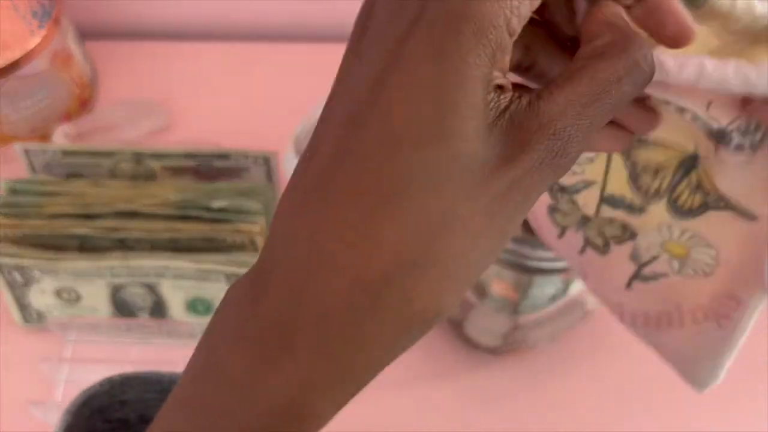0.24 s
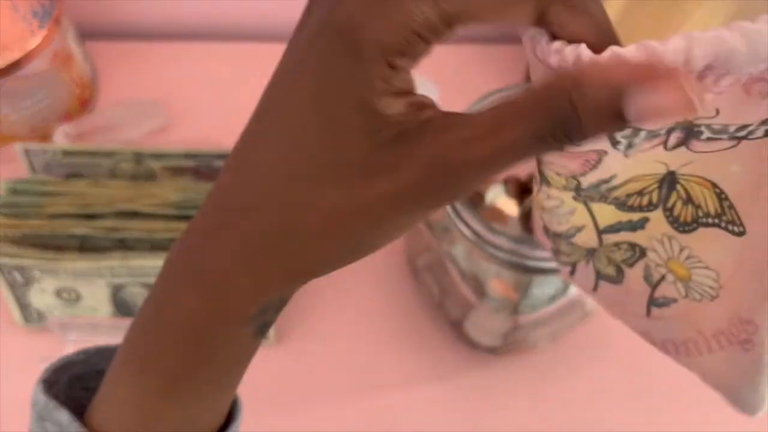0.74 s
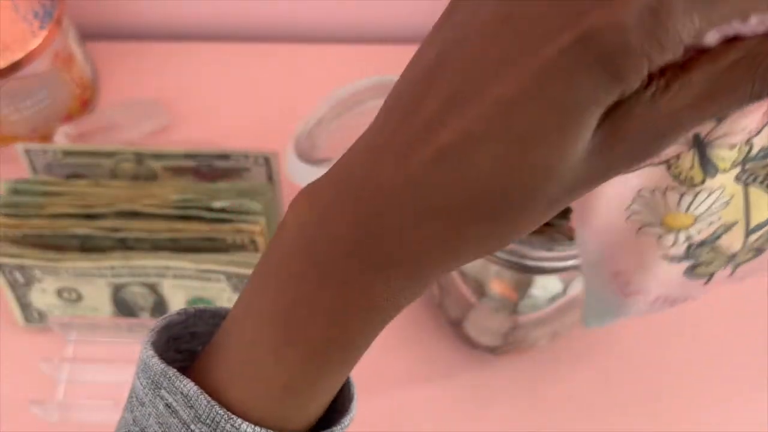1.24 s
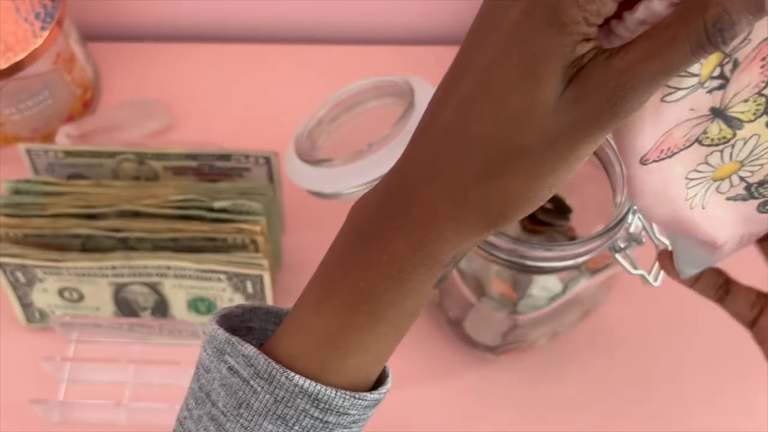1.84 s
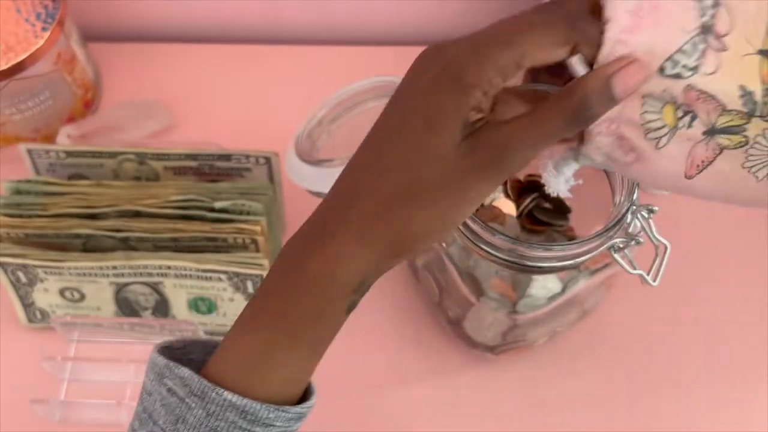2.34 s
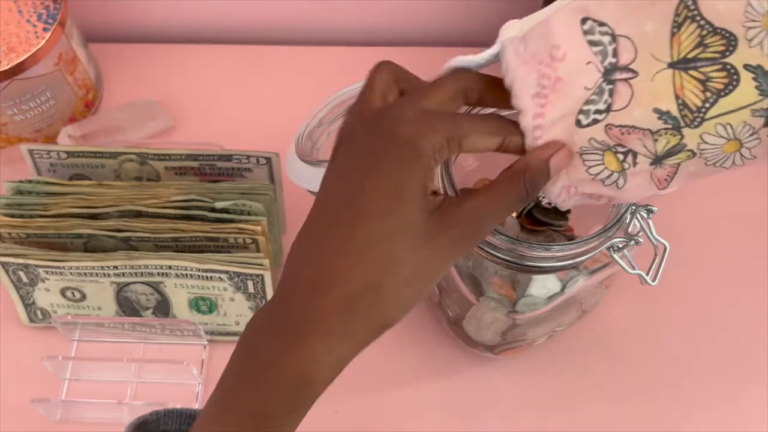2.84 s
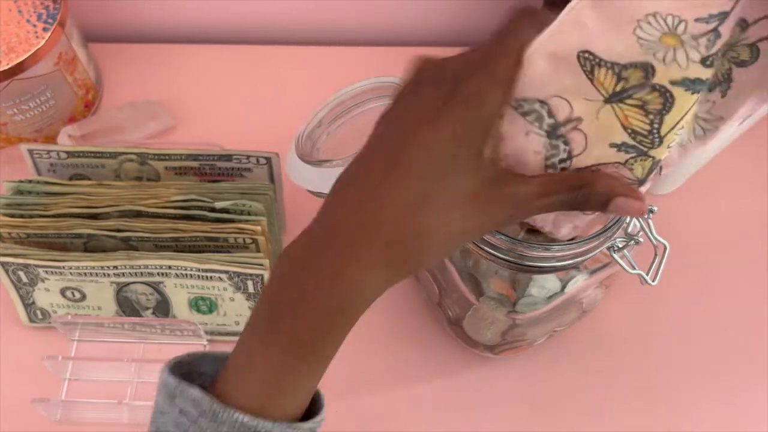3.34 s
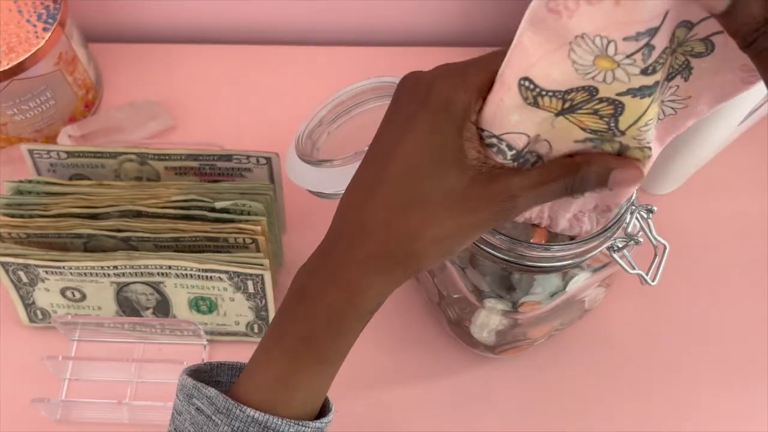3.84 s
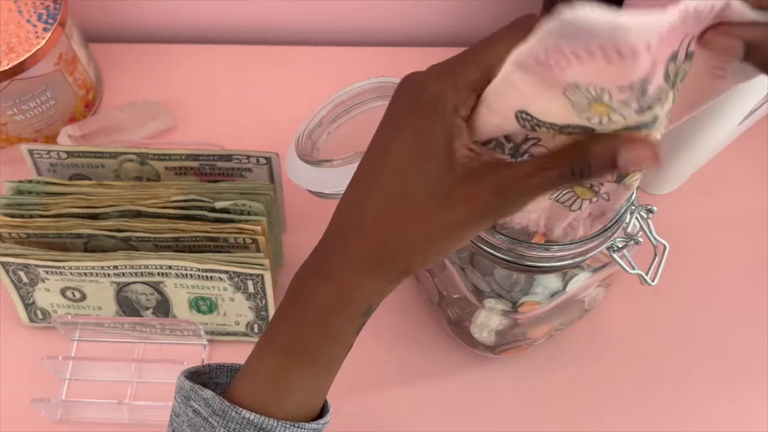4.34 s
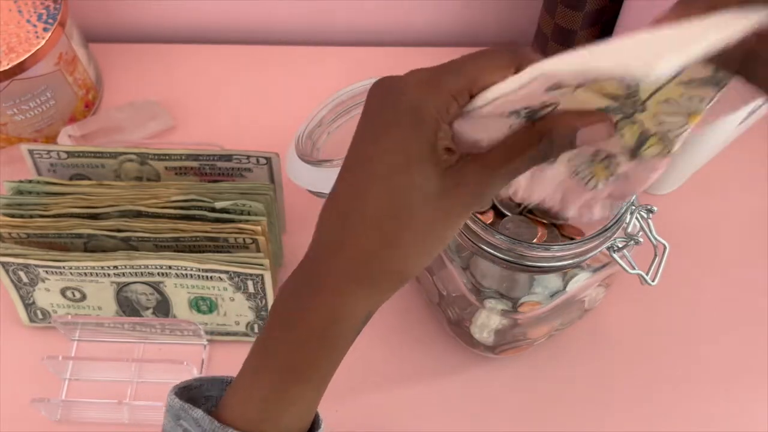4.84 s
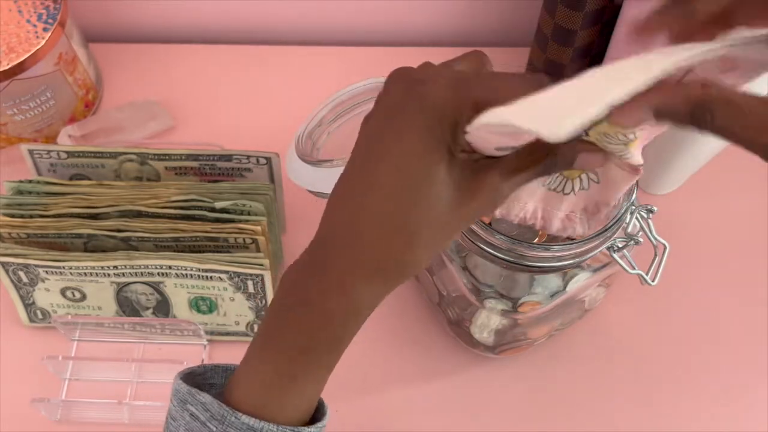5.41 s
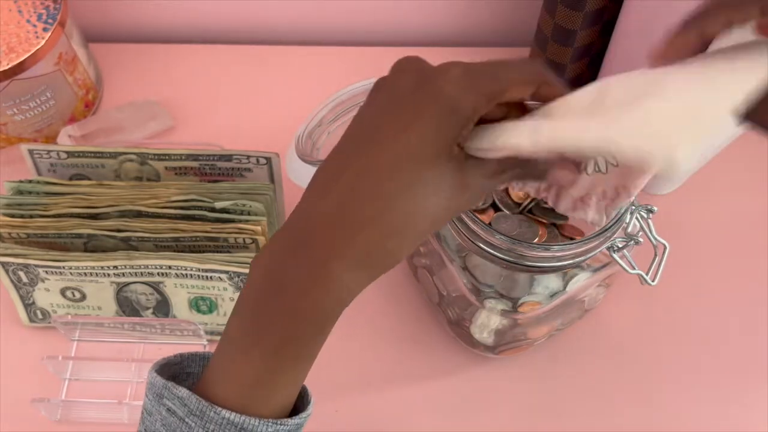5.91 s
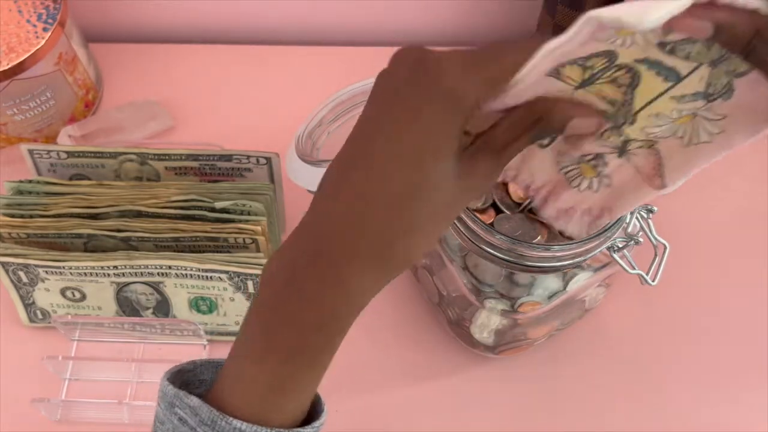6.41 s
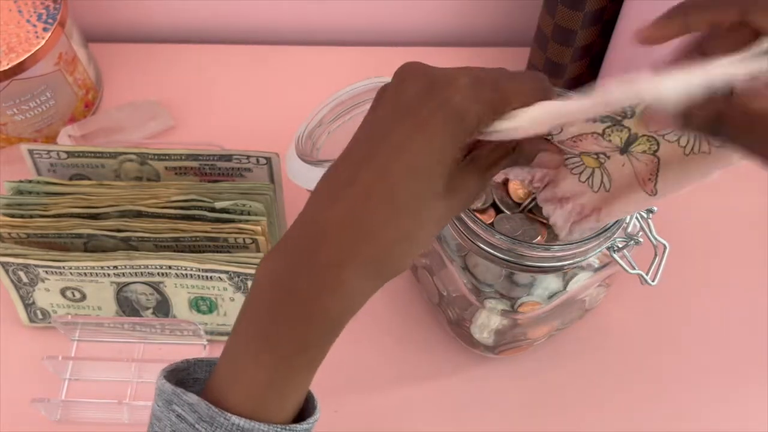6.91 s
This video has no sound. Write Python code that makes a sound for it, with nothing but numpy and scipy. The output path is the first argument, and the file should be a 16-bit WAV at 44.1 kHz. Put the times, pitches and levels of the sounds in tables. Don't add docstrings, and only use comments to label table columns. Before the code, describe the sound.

Faint pouch jingles build to a loud, bright crash of coins landing in a glass jar, then sparse clinks and soft knocks in a quiet room.

```python
import sys
import numpy as np
from scipy import signal
from scipy.fft import rfft, irfft
from scipy.io import wavfile
from scipy.ndimage import uniform_filter1d, minimum_filter1d, map_coordinates

SR = 44100
rng = np.random.default_rng(int(sys.argv[2]) if len(sys.argv) > 2 else 0)


def master(y):
    cut = np.clip(np.atleast_2d(y).T, -1, 1)
    pcm = np.round(cut * 32767)
    wavfile.write(sys.argv[1], SR, pcm.astype(np.int16))


def attenuation_scalar(level_db):
    decades = np.asarray(level_db, float) / 20
    return 10 ** decades


N = 316197


def rms_one(x):
    return x / np.sqrt(np.mean(x ** 2) + 1e-20)


def add(out, s, sound):
    first = round(s * SR)
    out[first:first + len(sound)] += sound


def in_time(rows):
    s, value = np.transpose(rows)
    return np.interp(np.arange(N) / SR, s, value)


def at_hz(points, hz):
    point_hz, value = np.transpose(points)
    return np.interp(np.log(hz), np.log(point_hz), value)


def colour(x, spectrum):
    hz = np.maximum(np.fft.rfftfreq(N, 1 / SR), 1)
    return rms_one(irfft(rfft(x) * attenuation_scalar(at_hz(spectrum, hz)), N))


def drift(rate):
    knots = rng.standard_normal(400)
    return map_coordinates(knots, [np.arange(N) / SR * rate * 2], order=3)


def tone(hz, level_db):
    return np.sqrt(2) * attenuation_scalar(level_db) * np.sin(2 * np.pi * np.cumsum(hz) / SR)


def ring(clicks, hz, t60):
    radius = attenuation_scalar(-60 / (max(t60, .004) * SR))
    w = 2 * np.pi * hz / SR
    return signal.lfilter([0, np.sin(w)], [1, -2 * radius * np.cos(w), radius ** 2], clicks + 1e-18)


def strike(times, level_db, modes, spread_db, detune):
    out, t = np.zeros(N + SR), np.arange(SR // 3)[:, None] / SR
    hz, mode_db, t60 = np.transpose(modes)
    for s, db, luck in zip(times, level_db, rng.standard_normal((len(times), 3, len(modes)))):
        height = attenuation_scalar(db + mode_db + spread_db * luck[0]) * np.sign(luck[1])
        blow_hz = hz * (1 + detune * luck[2])
        waves = np.sin(2 * np.pi * blow_hz * t) * np.exp(-np.log(1000) * t / t60)
        add(out, s, waves @ height)
    return out[:N]


def grains(per_s, size_db, clump_db):
    sizes = attenuation_scalar(size_db * np.minimum(rng.exponential(1, N), 4)) * rng.choice([-1, 1], N)
    chance = per_s * attenuation_scalar(clump_db * drift(14)) / SR
    return sizes * (rng.random(N) < chance)


def rattle(clicks, modes):
    dealt = rng.integers(0, len(modes), N)
    total = 0
    for k, (hz, db, t60) in enumerate(modes):
        total = total + attenuation_scalar(db) * ring(clicks * (dealt == k), hz, t60)
    return rms_one(total)


# time_s, level_db
MOTOR_LEVEL = [(0, -45), (.4, -40.5), (.86, -39.5), (1.36, -41), (1.84, -39), (2.46, -43.5), (3.0, -42.5),
               (3.4, -45), (3.8, -45), (4.2, -41), (4.9, -40.5), (5.65, -40.5), (6.25, -43.5),
               (7.17, -42.5)]


def motor():
    hum = tone(59 + 0.2 * drift(2.7), in_time(MOTOR_LEVEL))
    whine = tone(239.7 + 1.5 * drift(8.7), -67.5 + 2.7 * drift(4.4))
    return hum + whine


# time_s, level_db
SWAY_LEVEL = [(0.0, -37.5), (0.12, -53.5), (0.8, -21), (1.05, -20.5), (1.2, -28.5), (1.33, -17.5),
              (1.48, -24), (1.74, -47), (1.82, -48), (4.93, -47.5), (5.15, -40.5), (7.17, -54)]
# time_s, swings_hz
SWAY_PACE = [(0.4, 4.2), (1.1, 4.0), (1.25, 6.16), (1.4, 4.16)]


def pressure_sway():
    swings = np.cumsum(in_time(SWAY_PACE)) / SR
    crest = swings[round(.92 * SR)]
    return np.sqrt(2) * attenuation_scalar(in_time(SWAY_LEVEL)) * np.cos(2 * np.pi * (swings - crest))


# freq_hz, density_db_per_hz
AIR = [(100, -40.5), (175, -15), (239, -11.5), (300, -11.5), (600, -14.5), (1240, -27.5), (6600, -31),
       (15800, -63)]
# freq_hz, density_db_per_hz
RUMBLE = [(8, -1), (30, 3.5), (42, -15), (84, -12), (100, -15.5), (132, -12.5), (165, -27), (220, -52)]


def room_tone():
    air = attenuation_scalar(-70.5 + 0.4 * drift(6.3)) * colour(rng.standard_normal(N), AIR)
    rumble = attenuation_scalar(-52) * colour(rng.standard_normal(N), RUMBLE)
    return air + rumble


# freq_hz, t60_s
ROOM_T60 = [(120, .42), (400, .42), (1500, .36), (4000, .38), (7000, .33), (13000, .28)]


def room(x):
    t, echo = np.arange(SR // 2) / SR, 0
    edges = 70 * 2. ** np.arange(9)
    for low, high in zip(edges, edges[1:]):
        octave = signal.butter(2, [low, min(high, .45 * SR)], "band", fs=SR, output="sos")
        t60 = at_hz(ROOM_T60, low * 1.4)
        echo = echo + signal.sosfilt(octave, rng.standard_normal(len(t))) * attenuation_scalar(-60 * t / t60)
    echo = echo * np.clip((t - .002) / 0.0042, 0, 1)
    return signal.fftconvolve(x, echo / np.sqrt(np.sum(echo ** 2)))[:N]


# start_s, level_db, pitch_hz, length_s
CREAKS = [
    (0.056, -57.5, 780, 0.039),
    (2.632, -50.5, 430, 0.079),
    (5.923, -63, 497, 0.064),
    (6.784, -70, 1040, 0.097),
]


def creaks():
    out, t = np.zeros(N), np.arange(N) / SR
    cycles = np.cumsum(1 + 0.052 * drift(12)) / SR
    slips = rms_one(signal.lfilter([1], [1, -1.98, .9801], rng.standard_normal(N)))
    flutter = attenuation_scalar(1.9 * drift(22)) * (1 + 1.2 * slips)
    for s, db, hz, length in CREAKS:
        shape = np.sin(np.pi * np.clip((t - s) / length, 0, 1)) ** 2
        out += attenuation_scalar(db) * shape * flutter * np.sin(2 * np.pi * hz * cycles)
    return out


def gestures(rows, resting_db):
    start, length, *columns = np.transpose(rows)[:, :, None]
    t = np.arange(0, N + 64, 64) / SR
    rise_db_per_s, fall_db_per_s = 300, 209
    off_db = rise_db_per_s * np.maximum(start - t, 0) + fall_db_per_s * np.maximum(t - start - length, 0)
    levels = []
    for column in columns:
        power = np.sum(attenuation_scalar(column - off_db) ** 2, axis=0) + attenuation_scalar(resting_db) ** 2
        levels.append(np.interp(np.arange(N) / SR, t, 10 * np.log10(power)))
    return levels


# start_s, length_s, level_db
RUSTLES = [(.08, 0.074, -62.5), (.15, 0.44, -70), (.46, 0.026, -67), (.72, 0.09, -68.5), (1.0, 0.16, -68),
           (2.4, 0.33, -58.5), (2.88, 0.12, -72), (3.13, 0.38, -60), (3.5, 0.22, -40), (3.75, 0.12, -50),
           (4.04, 0.042, -63.5), (4.28, 0.13, -62), (4.5, 0.044, -48.5), (4.73, 0.25, -62),
           (5.3, 0.056, -63), (5.58, .12, -68.5), (5.94, 0.028, -70), (6.3, 0.21, -65), (6.7, 0.14, -70),
           (7.0, 0.076, -68)]
# freq_hz, density_db_per_hz
CLOTH = [(120, -54), (200, -19), (240, -11), (428, -5), (1240, -21), (2500, -30), (3250, -36), (5500, -120)]


def rustling_cloth():
    cloth_db, = gestures(RUSTLES, resting_db=-81.5)
    return attenuation_scalar(cloth_db - 1.5) * colour(grains(900, 3.0, 2.3), CLOTH)


# start_s, length_s, slide_db, tumble_db
STIRS = [(.08, 0.42, -70.5, -66.5), (.29, .03, -66, -85), (.46, .04, -61, -74), (.6, 0.23, -78, -74),
         (.94, 0.17, -86, -71), (1.61, 0.046, -61.5, -68.5), (1.78, 0.22, -68, -99),
         (2.07, 0.098, -75, -78), (2.36, 0.055, -62, -65), (2.455, 0.064, -39, -56.5),
         (2.62, 0.044, -43, -65), (2.72, 0.075, -50.5, -66), (2.95, 0.017, -50, -75),
         (3.18, 0.16, -44, -79), (3.41, 0.026, -36.5, -49), (3.52, 0.14, -27.5, -35.5),
         (3.7, 0.053, -35, -40.5), (3.81, 0.046, -47.5, -54.5), (4.5, 0.017, -40.5, -44),
         (4.6, 0.059, -54, -57), (4.75, 0.32, -70.5, -71.5), (5.05, 0.035, -64, -80.5),
         (5.3, 0.023, -75.5, -57), (5.51, 0.02, -79, -73.5), (5.66, 0.035, -75.5, -72),
         (5.93, .03, -80.5, -74), (6.2, 0.25, -70.5, -66.5), (6.69, 0.055, -74.5, -67.5),
         (6.84, 0.03, -74, -71.5), (7.0, 0.054, -75, -73)]
# freq_hz, level_db, t60_s
JAR = [(2418, -14.5, 0.059), (2530, -15, 0.027), (3200, -14.5, 0.024), (3280, -11.5, 0.037),
       (3380, -7.5, 0.032), (3550, -19.5, 0.26), (3600, -20, 0.16), (3519, 4.5, 0.012), (3800, -10, .016),
       (4407, -8, 0.019), (5090, -8, 0.028), (6160, -8.5, 0.024), (6750, -10.5, 0.025), (8100, -6.5, 0.022)]
# freq_hz, level_db, t60_s
COINS = [(6430, -5.5, 0.054), (9200, -2, .1), (9400, 1, 0.15), (9740, -8, 0.06), (10300, -10.5, .05),
         (11850, -5, .08), (12550, 1, .05), (12800, 4, 0.045), (13050, 0, 0.04), (14600, -1, .05),
         (15280, 3, 0.07), (15600, 0, .06)]
# freq_hz, density_db_per_hz
POUCH = [(1200, -24), (1950, -15), (2400, 3), (2900, 1), (3500, -2), (5000, -5.5), (6900, -3), (10000, -20)]
# freq_hz, density_db_per_hz
SLIDE = [(880, -53.5), (1500, -30), (7470, -9.5), (8660, -13.5), (9190, -7), (11100, -7.5), (12800, -7.5),
         (15800, -10)]


def moving_coins():
    slide_db, tumble_db = gestures(STIRS, resting_db=-92.5)
    knocks, rubs = grains(260, 3.5, 4.0), grains(2500, 2.2, 2.5)
    on_glass = np.clip((tumble_db + 62) / 15, 0, 1)
    tumble = 0.63 * on_glass * rattle(knocks, JAR) + 1.09 * colour(grains(4000, 3.2, 2.6), POUCH)
    loose = np.clip((slide_db + 80) / 15, 0, 1)
    slide = .65 * loose * rattle(rubs, COINS) + .85 * colour(rubs, SLIDE)
    return attenuation_scalar(tumble_db - 3.5) * tumble + attenuation_scalar(slide_db - 2.5) * slide


# start_s, peak_db, pitch_hz
TICKS = [(0.2425, -46, 13400), (0.3999, -48, 13300), (0.4556, -55, 11500), (0.5376, -47, 13900),
         (1.045, -56, 9800), (1.254, -64, 7240), (1.3146, -74, 2100), (1.4156, -45, 12000),
         (1.4747, -60, 9200), (1.582, -53, 9900), (1.6247, -41, 7600), (1.6658, -50, 9900),
         (1.6955, -50, 6200), (1.7855, -54, 5900), (1.7895, -51, 14300), (1.8329, -50, 9900),
         (1.8756, -45, 10800), (1.894, -39, 14500), (1.9948, -52, 10000), (2.0574, -51, 14100),
         (2.0659, -53, 14500), (2.1482, -59, 7700), (2.3533, -51, 6800), (2.3585, -48, 7500),
         (2.3722, -40, 9000), (2.4104, -45, 10100), (2.4291, -40, 12600), (2.4555, -30, 12650),
         (2.48, -29, 15400), (2.5074, -35, 7800), (2.5316, -28, 13160), (2.5725, -35, 13100),
         (2.5807, -34, 13100), (2.588, -33, 13100), (2.6201, -36, 12900), (2.6369, -37, 12300),
         (2.6491, -25.5, 15300), (2.6768, -29, 12700), (2.6823, -34, 12600), (2.7, -41, 12600),
         (2.7037, -36, 12700), (2.7299, -44, 9660), (2.7693, -39, 14200), (2.7965, -45, 9800),
         (2.8207, -48, 13700), (2.8344, -51, 13700), (2.8646, -55, 9500), (2.9025, -44, 14100),
         (2.9302, -37, 14300), (2.9349, -38, 14900), (2.9434, -37, 14900), (2.9938, -55, 9300),
         (3.0779, -43, 14900), (3.1422, -28, 14800), (3.1504, -27, 15000), (3.1674, -24, 14900),
         (3.1886, -24, 14600), (3.2719, -32, 10800), (3.3108, -40, 9600), (3.3413, -43, 9600)]
# start_s, peak_db, pitch_hz
CLINKS = [(3.3974, -24, 6340), (3.4009, -22, 3200), (3.4101, -22, 15400), (3.4176, -24, 15200),
          (3.4787, -31, 15200), (3.4959, -23, 6440), (3.5328, -12, 3350), (3.5455, -12, 3400),
          (3.553, -9.5, 8030), (3.5565, 1, 3306), (3.561, -15, 3800), (3.5807, -12, 3600),
          (3.5884, -16.5, 3440), (3.5979, -16, 3400), (3.6226, -15.5, 3340), (3.6289, -17, 3460),
          (3.6441, -4, 3600), (3.6476, 2, 3520), (3.7566, -22, 3600), (3.9174, -44, 15300),
          (3.9254, -45.5, 15260), (4.3979, -28.5, 6460), (4.4066, -28, 15400), (4.4106, -31, 15300),
          (4.4457, -30.5, 3400), (4.464, -31, 12400), (4.4867, -38, 6800), (4.4956, -30, 15100),
          (4.5081, -27, 6500), (4.5158, -31, 3950), (4.6166, -43, 9500), (4.6246, -36, 9700),
          (4.7807, -47, 6460), (4.7972, -46, 6460), (4.8162, -23, 7220), (4.8311, -28, 6600),
          (4.8558, -36, 6800), (5.004, -54, 6830), (5.2175, -32, 15300), (5.225, -29, 9230),
          (5.2564, -31, 9500), (5.2918, -43, 3600), (5.3175, -33.5, 9100), (6.106, -25, 7200),
          (6.1125, -10.5, 3500), (6.2232, -30, 3540), (6.2332, -33, 3770), (6.2459, -37, 3600),
          (6.2856, -44, 3600)]


def contacts(rows, gain_db, t60, snap):
    out, t = np.zeros(N + SR), np.arange(SR // 40) / SR
    for (s, db, hz), grit in zip(rows, rng.standard_normal((len(rows), len(t)))):
        ping = np.sin(2 * np.pi * hz * t) * (1 - np.exp(-t / .0003)) * attenuation_scalar(-60 * t / t60)
        crackle = snap * np.diff(grit, prepend=0) * attenuation_scalar(-60 * t / (.6 * t60))
        add(out, s - .0004, attenuation_scalar(db + gain_db) * (ping + crackle))
    return out[:N]


# start_s, peak_db, pitch_hz
RINGS = [(0.193, -57, 9240), (1.475, -59, 9240), (2.37, -51, 9180), (2.51, -49, 9200),
         (2.955, -55, 9270), (3.745, -46, 9300), (4.5, -48, 9300), (4.6, -53, 9400), (3.15, -45, 9410),
         (3.41, -38, 9060), (3.46, -38, 9220), (4.32, -66, 9150), (4.402, -52, 9180), (4.55, -51, 9430),
         (5.0, -64, 9130), (5.055, -61, 9150), (5.22, -42, 9340), (5.318, -48, 9330),
         (6.112, -42, 9190),
         (0.195, -59, 15280), (2.51, -48, 11860), (2.39, -47, 15300), (3.145, -46, 14720),
              (3.41, -32, 15410), (3.532, -28, 15580), (3.62, -33, 15100), (3.708, -32, 15120),
              (3.755, -38, 11410), (3.805, -41, 11410), (2.93, -52, 14900), (2.95, -52, 12700),
              (3.165, -42, 14850), (2.44, -48, 12800), (3.765, -30, 15270), (3.785, -41, 12520),
              (3.92, -56, 15570), (4.325, -65, 15270), (4.32, -66, 12520), (4.402, -40, 15250),
              (4.46, -49, 12720), (4.47, -52, 11440), (4.49, -46, 15520), (4.62, -51, 15520),
              (5.06, -65, 11890), (5.05, -66, 12700), (5.24, -52, 11880), (5.245, -48, 15260),
              (5.262, -53, 12680), (5.318, -53, 15520), (6.113, -24, 15300)]


def singing_coins():
    out, t = np.zeros(N + SR), np.arange(SR // 2) / SR
    rings = RINGS
    for (s, peak_db, hz), luck in zip(rings, rng.random((len(rings), 6))):
        twin = .3 * np.sin(2 * np.pi * ((hz + 15 + 50 * luck[0]) * t + luck[1]))
        below = 0.33 * np.sin(2 * np.pi * ((hz - 40 - 120 * luck[2]) * t + luck[3]))
        above = 0.68 * np.sin(2 * np.pi * ((hz + 70 + 150 * luck[4]) * t + luck[5]))
        shape = (1 - np.exp(-t / 0.0041)) * attenuation_scalar(peak_db + 5.0 - 60 * t / .17)
        add(out, s, (np.sin(2 * np.pi * hz * t) + twin + below + above) * shape)
    return out[:N] * attenuation_scalar(2.5 * drift(24))


# start_s, jar_wall_db, bright_scatter_db, desk_thump_db
LANDINGS = [(3.3972, -25, -31, -17), (3.409, -30, -23.5, -50), (3.4957, -26.5, -38, -22),
            (3.5333, -10, -8.5, -17), (3.5531, -1, -13.5, -13), (3.545, -23, -28, -39.5),
            (3.5869, -14, -37.5, -41.5), (3.6294, -14, -32, -43), (3.643, -4.5, -31, -18),
            (3.7077, -26, -43, -21.5), (3.7397, -24.5, -43, -21.5), (3.917, -53, -41.5, -33.5),
            (4.0498, -58.5, -72, -43.5), (4.3973, -45.5, -35.5, -45), (4.4064, -49, -35, -60),
            (4.6238, -56.5, -41, -45), (4.4451, -41, -30, -22.5), (4.4853, -34, -30, -20.5),
            (4.5065, -25.5, -30, -54), (4.615, -59, -43, -31), (4.782, -51, -48.5, -53),
            (4.7966, -54, -54, -65), (4.8127, -34, -27.5, -41), (5.2173, -34, -28.5, -23.5),
            (5.29, -41.5, -48, -47), (5.3136, -52, -32, -30.5), (6.1058, -36, -29, -17.5),
            (6.1109, -10, -22, -41), (6.133, -47, -31, -55.5), (6.177, -51, -29, -31.5),
            (5.7991, -67, -63, -70), (6.629, -67.5, -69, -62.5)]
# start_s, peak_db, pitch_hz
KNUCKLES = [(0.202, -59, 296), (0.418, -49, 290), (0.957, -51.5, 283), (1.615, -48, 350), (2.421, -67, 377),
            (3.143, -47, 520), (3.162, -41.5, 498), (3.336, -45.5, 640), (3.787, -44, 504),
            (4.651, -36.5, 283), (4.922, -54.5, 331), (5.055, -48, 329), (5.529, -50.5, 535),
            (5.669, -48.5, 463), (5.932, -47.5, 393), (5.974, -52.5, 349), (6.419, -46, 285),
            (6.563, -44, 474), (6.623, -44.5, 447), (6.688, -46.5, 564), (6.756, -47, 357)]
# freq_hz, level_db, t60_s
DESK = [(137, -7.5, 0.22), (195, -21, 0.012), (236.6, -6, 0.013), (326.7, -6, 0.088), (430, -2.5, 0.062),
        (565, -4.5, 0.049), (708, -13.5, 0.024), (1003, -7.5, 0.0672), (1327, -11.5, 0.0028),
        (1800, -28, 0.014)]
# freq_hz, density_db_per_hz
HEAP = [(90, -30.5), (140, -6.5), (450, 1.5), (900, -14), (1800, -19), (3000, -48)]


def thumps():
    pushes = list(KNUCKLES)
    for s, _, _, db in LANDINGS:
        hz = 350 * np.exp(0.1 * rng.standard_normal())
        pushes.append((s - 0.0023, db, hz))
    s, peak_db, _ = np.transpose(pushes)
    out, shudder, t = np.zeros(N + SR), np.zeros(N + SR), np.arange(SR // 5) / SR
    for at, db, hz in pushes:
        add(out, at + .003, -attenuation_scalar(db - 1.5 - 60 * t * hz / 9.9) * np.sin(2 * np.pi * hz * t))
        add(shudder, at + 0.0025, attenuation_scalar(db - 17.0 - 60 * t / 0.16))
    heap = shudder[:N] * colour(rng.standard_normal(N), HEAP)
    desk = strike(s + 0.00325, peak_db - 15.0, DESK, spread_db=4.5, detune=0.051)
    return out[:N] + heap + desk


# start_s, bright_scatter_db
JOLTS = [(0.194, -44.5), (0.2422, -40.5), (0.2744, -48), (0.397, -49), (0.4544, -48), (0.4794, -52),
         (0.5354, -49), (1.044, -56), (1.067, -50.5), (1.4146, -40), (1.4721, -46.5), (1.6225, -36),
         (1.695, -47.5), (1.7855, -47.5), (1.8294, -44), (1.877, -39.5), (2.0644, -55), (2.2907, -51),
         (2.358, -46), (2.383, -43), (2.408, -38), (2.455, -38), (2.7674, -41), (2.8996, -46), (2.929, -40),
         (3.0627, -44.5), (3.1425, -31.5), (3.1635, -31.5), (4.315, -47.5), (5.005, -48.5), (5.0544, -47.5)]


def blows():
    jolts = [(s, db - 5.5, db - 30, db) for s, db in JOLTS]
    falls = []
    for s, jar_db, bright_db, _ in LANDINGS:
        together_db = 20 * np.log10(np.hypot(attenuation_scalar(jar_db), attenuation_scalar(bright_db)))
        falls.append((s, together_db + 1, jar_db, bright_db))
    return np.transpose(jolts + falls)


# freq_hz, density_db_per_hz
CRACK = [(700, -34), (1500, -23), (2800, -15.5), (3500, -3.5), (4500, -5), (7000, -2.5), (9000, -11.5),
         (11000, -26)]
# freq_hz, density_db_per_hz
BRIGHT = [(4000, -18.5), (7000, -4.5), (9300, -3), (12000, -2.5), (15800, -3.5)]


def landings():
    s, crack_db, jar_db, bright_db = blows()
    glass = strike(s, jar_db - 5.5, JAR, spread_db=5.5, detune=0.012)
    crack, bright, t = np.zeros(N + SR), np.zeros(N + SR), np.arange(SR // 3) / SR
    for k in range(len(s)):
        settle = np.interp(crack_db[k], [-45, -15], [.075, .035])
        add(crack, s[k], attenuation_scalar(crack_db[k] - 12.0 - 60 * t / settle))
        add(bright, s[k], attenuation_scalar(bright_db[k] - 5.5 - 60 * t / settle))
    dull = colour(grains(6000, 3.2, 2.0), CRACK)
    sharp = colour(grains(6000, 3.2, 2.0), BRIGHT)
    flicker = attenuation_scalar(2.5 * drift(24))
    return glass * flicker + crack[:N] * dull + bright[:N] * sharp


def scene():
    background = motor() + pressure_sway() + room_tone()
    coins = creaks() + rustling_cloth() + moving_coins() + singing_coins() + thumps() + landings()
    coins = coins + contacts(TICKS, gain_db=-1.0, t60=0.015, snap=.3)
    coins = coins + contacts(CLINKS, gain_db=-1.5, t60=.014, snap=.25)
    return (coins + attenuation_scalar(-8) * room(coins) + background)[None]


def low_pass(x):
    return signal.sosfilt(signal.butter(12, 16820, fs=SR, output="sos"), x)


def record(dry):
    cutoff_hz, ceiling_db, release_db_per_s = 15780, -2, 298
    cut = signal.sosfilt(signal.ellip(8, .5, 45, cutoff_hz, fs=SR, output="sos"), dry)
    ramp = release_db_per_s * np.arange(N) / SR
    over_db = np.maximum(20 * np.log10(np.abs(cut) + 1e-9) - ceiling_db, 0)
    duck_db = np.maximum.accumulate(over_db + ramp, axis=1) - ramp
    gain_db = uniform_filter1d(minimum_filter1d(-duck_db, size=17, axis=1), size=17, axis=1)
    held = cut * attenuation_scalar(gain_db)
    smooth = signal.sosfilt(signal.ellip(8, .2, 60, cutoff_hz + 500, fs=SR, output="sos"), held)
    return low_pass(smooth)


dry = scene()
out = record(dry)
master(out)
```